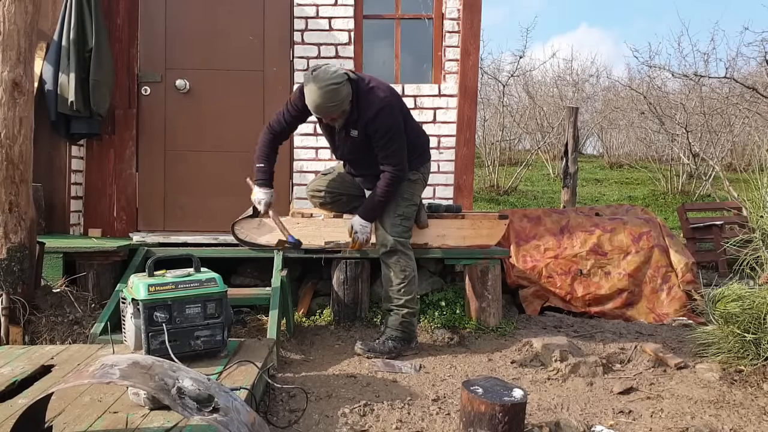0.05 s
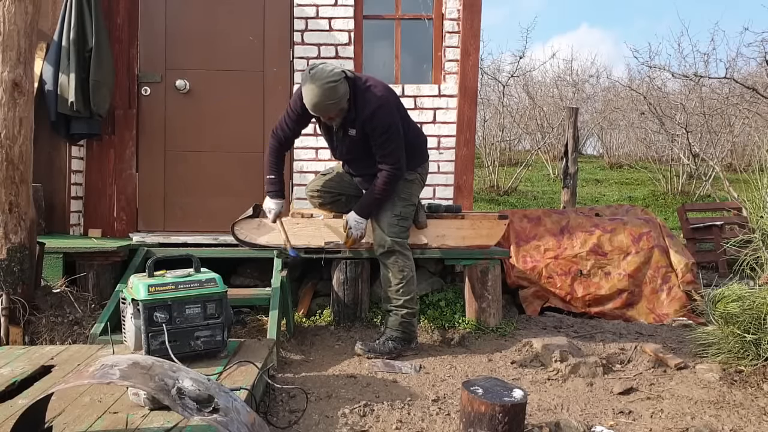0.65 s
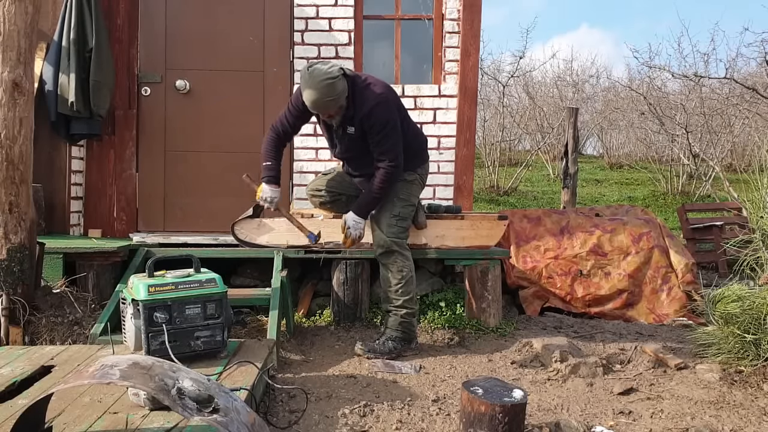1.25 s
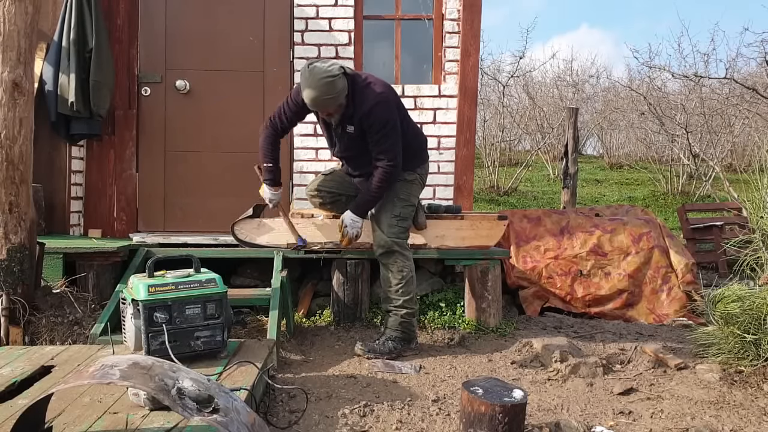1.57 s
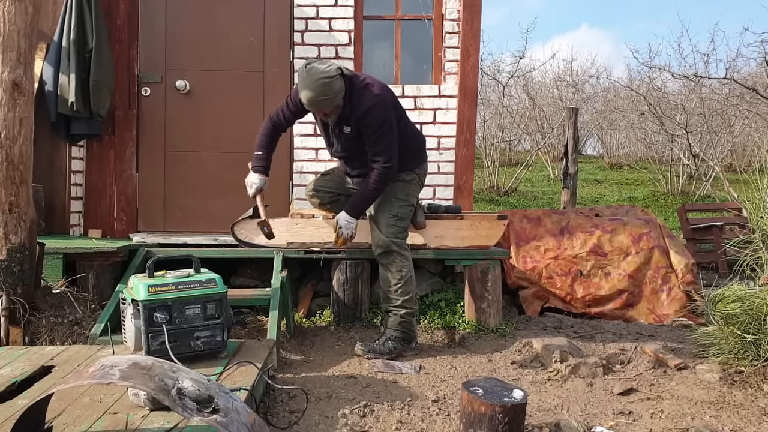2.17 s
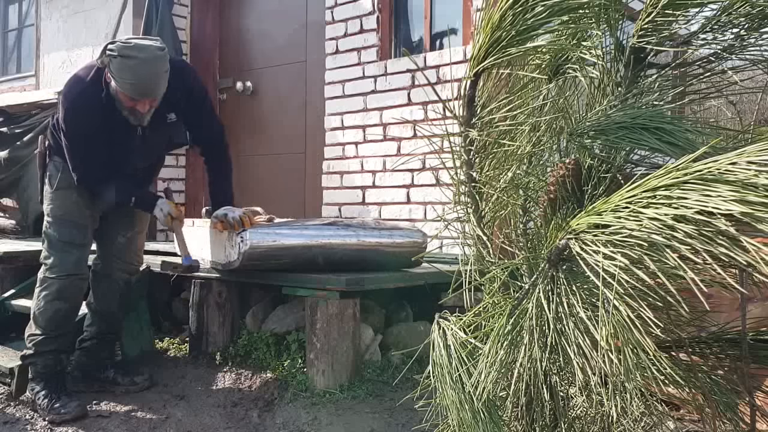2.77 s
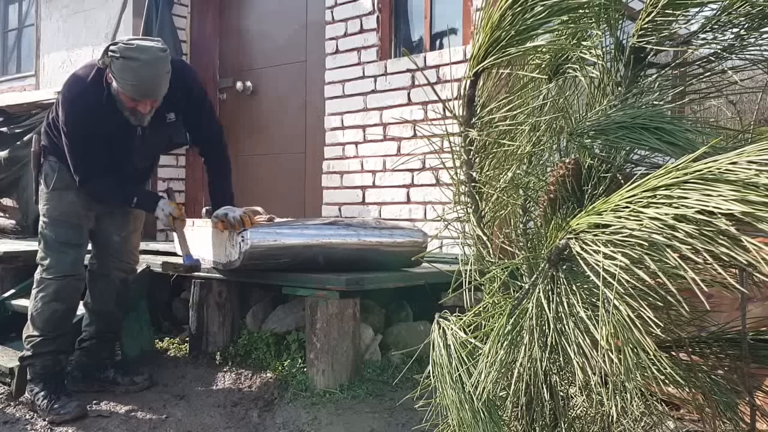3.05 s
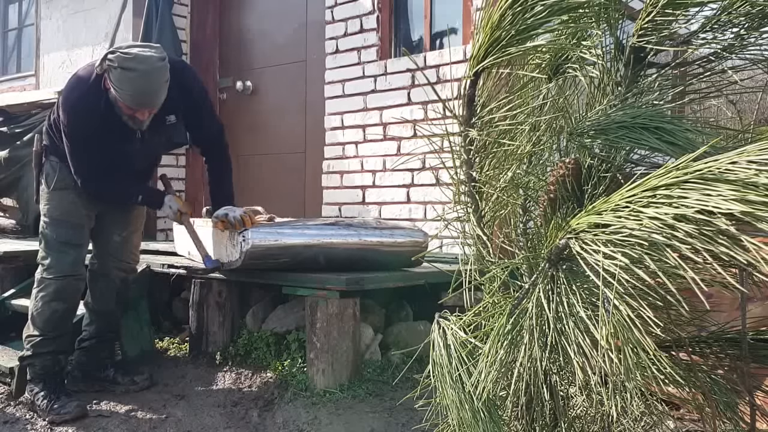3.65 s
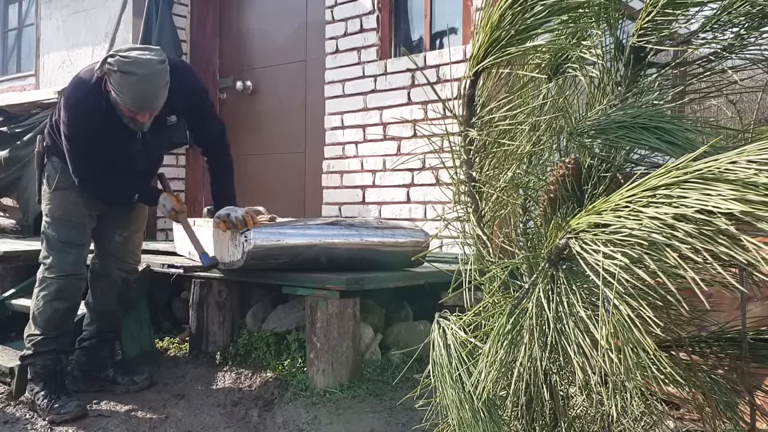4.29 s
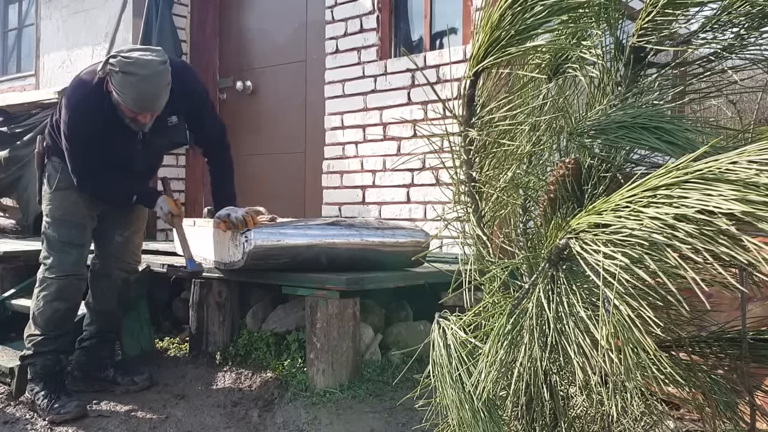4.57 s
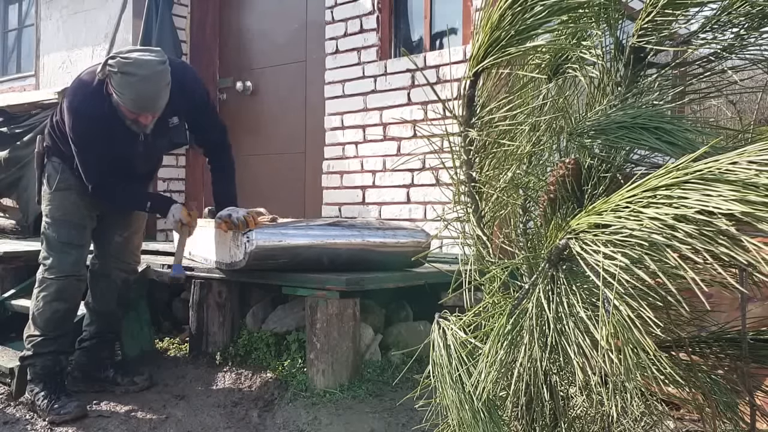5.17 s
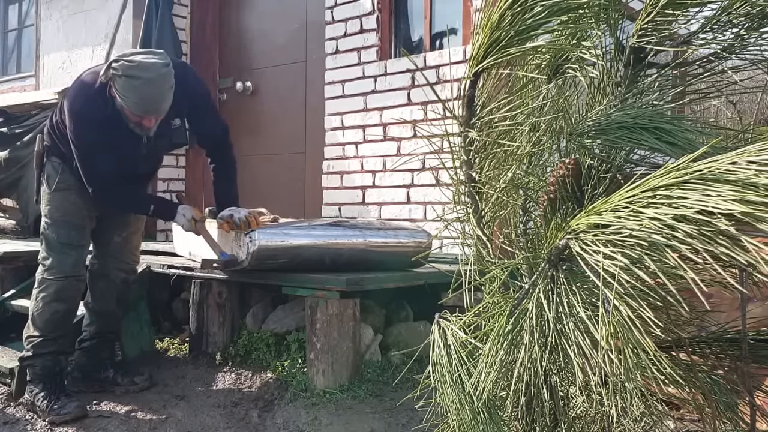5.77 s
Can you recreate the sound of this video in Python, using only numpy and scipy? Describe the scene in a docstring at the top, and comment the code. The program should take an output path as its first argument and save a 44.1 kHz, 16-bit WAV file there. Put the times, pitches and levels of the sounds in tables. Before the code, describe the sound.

A hammer clashes slowly on a rattling thin steel sheet, then beats a hollow steel shell faster with a deeper ring.

```python
"""A hammer beats thin steel on a wooden bench, in a quiet yard beside a brick wall.
First the sheet lies flat: slow, clashing blows, each leaving it buzzing and rattling on the boards.
Then the scene changes to the sheet bent into a hollow shell: a fast run with a deeper, longer ring.
Each hit layers a dense wash of bending modes, a few beating tones and the boom of the struck spot.
Faint wall reflections, a thin echo from the trees and a bed of still air sit behind the steel."""
import sys
import numpy as np
from scipy import signal
from scipy.fft import rfft, irfft
from scipy.io import wavfile
from scipy.ndimage import uniform_filter1d

SR = 44100
rng = np.random.default_rng(int(sys.argv[2]) if len(sys.argv) > 2 else 0)


def unload_audio(sound):
    """Save the sound as a 16-bit wav file, at the path given as the first command line argument."""
    columns = np.transpose(np.atleast_2d(sound))
    # keep every value between -1 and 1, then stretch to whole-number steps
    steps = np.round(np.clip(columns, -1, 1) * 32767)
    wavfile.write(sys.argv[1], SR, steps.astype(np.int16))


N = 261513

# hammer hits: (time [s], level [dB], extra clang [dB], extra crash [dB], swell [s], boom pitch [Hz])
FLAT_HITS = [ (-.075, -19, -2, 6.5, 0.026, 590), (.361, -24, 5, 3.5, 0.014, 466),
             (.792, -22, 5, 6.5, 0.011, 613), (1.206, -21, 3.5, 5.5, 0.013, 547),
             (1.632, -17, 1.5, -3.5, 0.015, 583), (2.075, -15, 0, -6, .0023, 753)]
SHELL_HITS = [ (2.150, -14, -11.5, -1.5, .002, 496), (2.448, -13, 3, -1.5, 0.0074, 455),
              (2.741, -15, 4, -4, 0.0063, 261), (2.994, -16, 0, -3, 0.0018, 613.5),
              (3.432, -17.5, -0.5, 6, 0.0029, 679), (3.738, -14.5, 3, 7.5, 0.0011, 367),
              (4.018, -15, 1, 1.5, 0.002, 512), (4.280, -14, 0.5, 1.5, 0.0019, 388.4),
              (4.553, -14.5, 6.5, -0.5, 0.00083, 386), (4.822, -14.5, 3, -1.5, .001, 464),
              (5.088, -14.5, .5, -5.5, 0.00051, 591), (5.353, -14, -2.5, 0, 0.00077, 610),
              (5.615, -16.5, -.5, -13, 0.00043, 255.4), (5.866, -14.5, .5, -5, 0.00092, 584)]
# light slaps after a blow: the steel bounces on the boards or, at 3.789 s, the hammer rebounds and
# strikes again: (first slap [s], level [dB], first hop [s])
SLAP_RUNS = [ (.007, -48.5, 0.045), (.423, -41.5, 0.056), (0.865, -44.5, .016), (1.289, -47.5, .066),
             (1.684, -47.5, 0.072), (2.108, -42.5, 0.021), (3.044, -46, 0.037), (3.789, -35, 0.012),
             (5.666, -56, 0.011)]
# the strongest modes, heard as tones: (pitch [Hz], level [dB], t60 [s])
FLAT_TONES = [(140, -13, .45), (188, -5, .31), (290, -8, .38), (403, -5, .25), (584, -3, .21),
              (748, -4, .15), (993, -4, .15), (1130, 1, .19), (1606, -3, .2), (1728, -3, .18),
              (2450, -7, .13), (2670, -10, .12), (4620, -16, .23)]
SHELL_TONES = [(130, -12, .28), (179, -2, .32), (263, -2, .3), (384, 0, .35), (457, -2, .42), (541, 0, .39),
               (589, 0, .34), (686, -4, .31), (1003, -7, .2), (1143, -7, .2), (1211, -7, .23),
               (1421, -8, .19), (1588, -9, .15), (1655, -7, .14), (2130, -16, .09), (2468, -14, .09),
               (2865, -15, .08), (3478, -17, .07), (3880, -17, .07), (4775, -18, .07)]
# tone colour of the wash of weaker modes: (frequency [Hz], spectral level [dB])
FLAT_WASH_EQ = [(40, -20.5), (70, -10.5), (125, -7.5), (300, -3.5), (600, 2.5), (1100, -3), (1700, -6.5),
                (2100, -10), (4600, -16.5), (9500, -24), (13000, -34.5), (16000, -53.5)]
SHELL_WASH_EQ = [(40, -47.5), (80, -21.5), (130, -10), (300, -6.5), (470, 2), (750, -2.5), (1400, -9.5),
                 (2000, -18), (4500, -20.5), (9000, -25), (12500, -34), (16000, -46.5)]
# how long the wash rings: (frequency [Hz], t60 [s])
FLAT_DECAY = [(80, 0.4), (210, .37), (560, 0.23), (1400, 0.2), (3800, 0.14), (12000, 0.045)]
SHELL_DECAY = [(80, 0.23), (200, 0.53), (500, 0.41), (1000, 0.25), (1700, .22), (3500, 0.13),
               (12000, 0.094)]
# tone colour of the buzz and the slaps: (frequency [Hz], spectral level [dB])
RATTLE_EQ = [(100, -12), (600, 1.5), (1600, 2), (3200, 2), (4200, 0), (4650, 1.5), (5200, -2), (6500, -6),
             (9500, -15.5), (13000, -25.5), (16000, -36.5)]
# tone colour of the outdoor air: (frequency [Hz], spectral level [dB])
AIR_EQ = [(25, -18), (60, 1.5), (160, -7.5), (400, -16.5), (1200, -19), (3500, -19), (9500, -18),
          (13000, -28.5), (16000, -38)]

HIT_SAMPLES = 27000
T, HZ = np.arange(HIT_SAMPLES) / SR, np.fft.rfftfreq(HIT_SAMPLES, 1 / SR)
BAND_HZ = np.geomspace(40, 17000, 22)
BANDS = np.array([np.interp(np.log(HZ + 1), np.log(BAND_HZ), row) for row in np.eye(len(BAND_HZ))])
TILT_OCTAVES = np.log2(1 + HZ / 1000)  # axis for treble tilts, levelling off below 1 kHz
THUD_HZ, BODY_HZ, CLANG_HZ, CRASH_HZ = 150, 450, 1400, 5000  # bench thud, body, bite of a hard contact


def amp(db):
    """Decibels to gain."""
    return 10 ** (np.asarray(db) / 20)


def curve(points, hz):
    """Joins (frequency, value) points on a log-frequency axis."""
    f, value = np.transpose(points)
    return np.interp(np.log(hz + 1), np.log(f), value)


def normalise(x):
    """Scales a hit to the energy of 1/20 s at rms 1."""
    return x * np.sqrt(SR / 20 / (np.sum(x ** 2) + 1e-20))


def add(mix, s, sound):
    """Mixes a sound in at time s, which may be negative."""
    start = round(s * SR)
    sound, part = sound[max(-start, 0):], mix[max(start, 0):]
    part[:len(sound)] += sound[:len(part)]


def random_spectrum():
    """A random strength and phase for every frequency."""
    return rng.standard_normal((len(HZ), 2)) @ np.array([1, 1j])


def mode_wash(weights, eq_db, envelopes):
    """Densely packed modes: each band follows its envelope and carries the energy the EQ gives it."""
    shape = BANDS * amp(eq_db)
    bands = irfft(shape * weights, HIT_SAMPLES, axis=1) * envelopes
    gains = np.linalg.norm(shape, axis=1) / (np.linalg.norm(bands, axis=1) + 1e-20)
    return normalise(gains @ bands)


def beating_tones(modes, detune):
    """Strong modes ring in beating pairs, shifted a little by the hand that holds the steel down."""
    hz, db, t60 = np.transpose(modes)[:, :, None]
    shift, phase = rng.uniform(-1, 1, (2, 2, len(modes), 1))
    pair_hz = hz + detune * np.sqrt(hz) * shift
    pairs = np.sin(2 * np.pi * pair_hz * T + np.pi * phase).sum(0)
    return normalise((amp(db - 60 * T / t60) * pairs).sum(0))


def hammering(hits, modes, wash_eq, wash_t60, *, tones_db, detune, smack, smack_s, bite, cascade_s,
              thud_db, thud_per_crash, boom_db, boom_per_crash, boom_t60, likeness, uneven_db):
    """Every blow rings the same steel, with mode weights that depend on where the hammer lands."""
    out, shared = np.zeros(N), random_spectrum()
    # short bending waves change most from one struck spot to the next
    kept = likeness / (1 + HZ / 5000)
    ripple = 4 * uniform_filter1d(rng.standard_normal(len(HZ)), size=16)
    radiation = amp(uneven_db * ripple)
    decay = amp(-60 * T / curve(wash_t60, BAND_HZ)[:, None])
    # bending waves take a moment to spread into the middle modes
    lag_s = cascade_s * np.exp(-np.log(BAND_HZ / 1300) ** 2)[:, None]
    treble = (BAND_HZ / (BAND_HZ + 3000))[:, None]
    attack = 1 - np.exp(-(T / .0018) ** 2)
    fade_out = np.minimum(1, (T[-1] - T) * 10)
    for s, db, clang_db, crash_db, swell_s, boom_hz in hits:
        weights = radiation * (kept * shared + np.sqrt(1 - kept ** 2) * random_spectrum())
        # the steel radiates most while it is being dented; a hard contact packs treble into that moment
        dent = 1 + smack * amp(bite * crash_db * treble) * np.exp(-T / smack_s)
        swell = 1 - np.exp(-T / (swell_s + lag_s))
        wash = mode_wash(weights, curve(wash_eq, HZ), decay * dent * swell)
        tones = amp(tones_db) * beating_tones(modes, detune)
        # steel that crashes onto the bench thuds more and booms less
        hit_eq = [(THUD_HZ, thud_db + thud_per_crash * crash_db), (BODY_HZ, 0),
                  (CLANG_HZ, clang_db), (CRASH_HZ, crash_db)]
        steel = irfft(rfft(wash + tones) * amp(curve(hit_eq, HZ)), HIT_SAMPLES)
        boom = normalise(np.sin(2 * np.pi * boom_hz * T) * amp(-60 * T / boom_t60))
        boom *= amp(boom_db + boom_per_crash * crash_db)
        add(out, s, amp(db) * attack * fade_out * (steel + boom))
    return out


def buzz(level_db=-22, per_crash=.2, t60=.2, rise_s=.03, tilt_db=2.5, touches_per_s=240, touch_s=.003):
    """Still shaking from a blow, the flat sheet touches the boards at random, ever more lightly."""
    out = np.zeros(N)
    envelope = amp(-60 * T / t60) * (1 - np.exp(-(T / rise_s) ** 2))
    colour = amp(curve(RATTLE_EQ, HZ) + tilt_db * TILT_OCTAVES)
    for s, db, _, crash_db, _, _ in FLAT_HITS:
        triggers = 1. * (rng.random(HIT_SAMPLES) < touches_per_s / SR)
        touches = signal.lfilter([1], [1, -np.exp(-1 / (touch_s * SR))], triggers)
        noise = irfft(random_spectrum() * colour, HIT_SAMPLES)
        chatter = normalise(noise * np.sqrt(touches) * envelope)
        add(out, s, amp(db + level_db + per_crash * crash_db) * chatter)
    return out


def rattles(t60=.074, rise_s=.0034, slaps=3, tilt_db=1.5, bounce_tilt_db=-2.5, bounce_db=-8.5,
            hop_ratio=.85):
    """Light slaps that quicken, fade and dull, as the steel bounces or the hammer rebounds."""
    out = np.zeros(N)
    shiver, snap = amp(-60 * T / t60), np.exp(-T / .0025)
    envelope = (shiver + snap) * (1 - np.exp(-T / rise_s))
    for s, db, hop_s in SLAP_RUNS:
        for bounce in range(slaps):
            eq_db = curve(RATTLE_EQ, HZ) + (tilt_db + bounce_tilt_db * bounce) * TILT_OCTAVES
            slap = normalise(irfft(random_spectrum() * amp(eq_db), HIT_SAMPLES) * envelope)
            add(out, s, amp(db + bounce_db * bounce) * slap)
            s, hop_s = s + hop_s, hop_s * hop_ratio
    return out


def yard(x, wet_db=-35, t60=.43, dull_hz=6000, echo_db=-60, echo_s=.29, echo_hz=1600, paths=3):
    """A faint scatter from the walls and a thin late echo from distant trees, on shifting paths."""
    out, turn = np.zeros(N), 2 * np.pi * np.arange(N) / SR
    for k in range(paths):
        walls = irfft(random_spectrum() / np.hypot(1, HZ / dull_hz), HIT_SAMPLES)
        walls *= amp(-60 * T / t60) * (1 - np.exp(-T / .046))
        trees = irfft(random_spectrum() * np.exp(-np.log((HZ + 1) / echo_hz) ** 2), HIT_SAMPLES)
        trees *= np.exp(-((T - echo_s) / .018) ** 2)
        response = amp(wet_db) * walls / np.linalg.norm(walls)
        response += amp(echo_db) * trees / np.linalg.norm(trees)
        send = np.sqrt(2 / paths) * np.cos(turn + np.pi * k / paths)  # one cycle a second
        out += signal.fftconvolve(x * send, response)[:N]
    return out


def air(db):
    """Still outdoor air: a soft rumble and a thin hiss."""
    colour = amp(curve(AIR_EQ, np.fft.rfftfreq(N, 1 / SR)))
    bed = irfft(rfft(rng.standard_normal(N)) * colour, N)
    return amp(db) * bed / bed.std()


def scene(change_s=2.371, crossfade_s=.008, low_cut_hz=74):
    """The flat sheet, then a quick crossfade to the hollow shell, already ringing; mono."""
    flat = hammering(FLAT_HITS, FLAT_TONES, FLAT_WASH_EQ, FLAT_DECAY, tones_db=-6.5, detune=.6,
                     smack=1.8, smack_s=.031, bite=1.1, cascade_s=.002,
                     thud_db=-.8, thud_per_crash=.45, boom_db=-5.5, boom_per_crash=-1.2, boom_t60=.077,
                     likeness=.31, uneven_db=1.4)
    shell = hammering(SHELL_HITS, SHELL_TONES, SHELL_WASH_EQ, SHELL_DECAY, tones_db=-5.5, detune=.4,
                      smack=3.7, smack_s=.0053, bite=.53, cascade_s=.013,
                      thud_db=1.26, thud_per_crash=.1, boom_db=-7.5, boom_per_crash=-.31, boom_t60=.1,
                      likeness=.63, uneven_db=1.97)
    crossfade = np.clip((np.arange(N) / SR - change_s) / crossfade_s, 0, 1)
    steel = (1 - crossfade) * (flat + buzz()) + crossfade * shell + rattles()
    # air slips round the edge of a small sheet, so it radiates little deep bass
    steel = signal.sosfilt(signal.butter(2, low_cut_hz, "high", fs=SR, output="sos"), steel)
    return (steel + yard(steel) + air(db=-74))[None]


def record(dry, ceiling=.95, high_cut_hz=16000):
    """A soft clip rounds off the loudest peaks; a steep low-pass trims the top."""
    rounded = dry / (1 + (dry / ceiling) ** 6) ** (1 / 6)
    low_pass = signal.firwin(255, high_cut_hz, window=("kaiser", 8), fs=SR)
    return signal.oaconvolve(rounded, low_pass[None], "same")


dry = scene()
out = record(dry)
unload_audio(out)
```